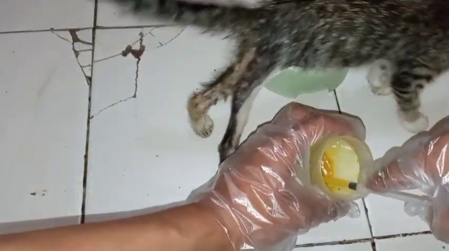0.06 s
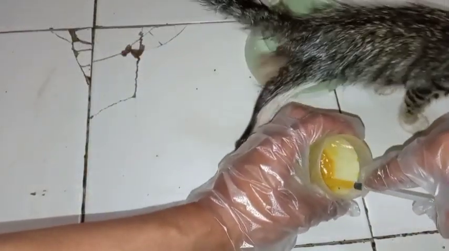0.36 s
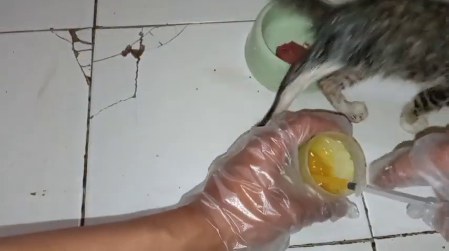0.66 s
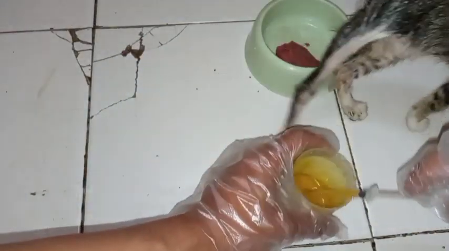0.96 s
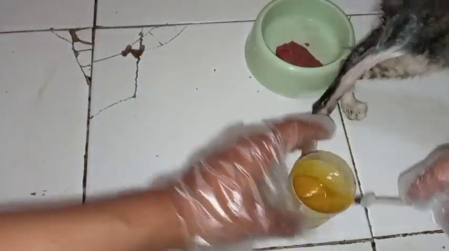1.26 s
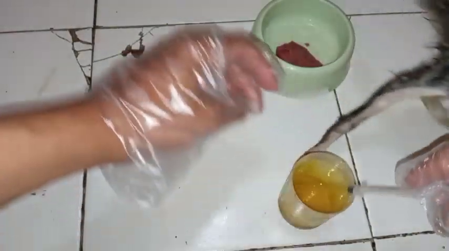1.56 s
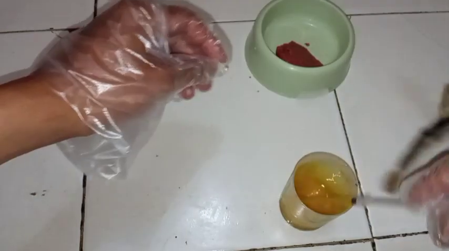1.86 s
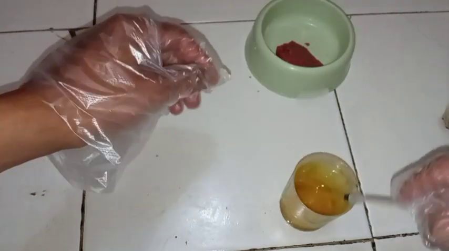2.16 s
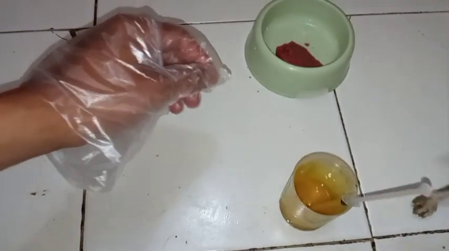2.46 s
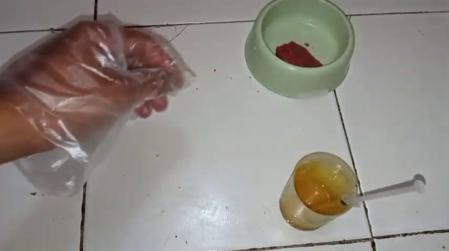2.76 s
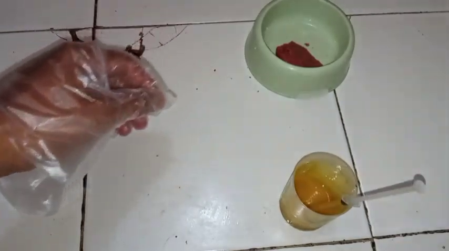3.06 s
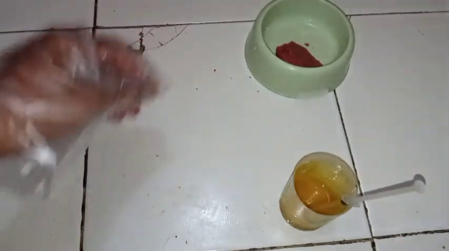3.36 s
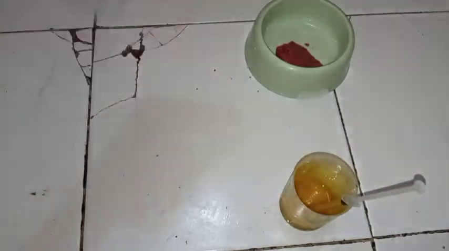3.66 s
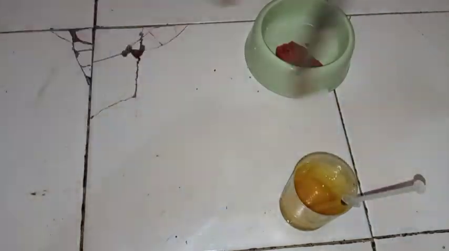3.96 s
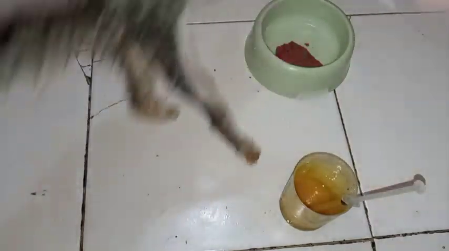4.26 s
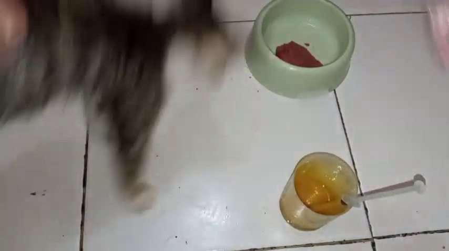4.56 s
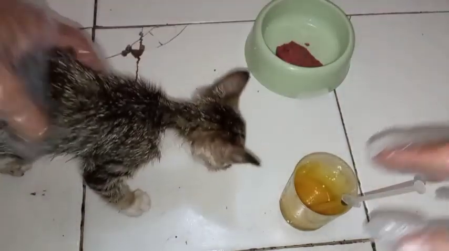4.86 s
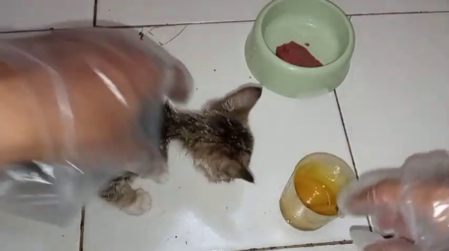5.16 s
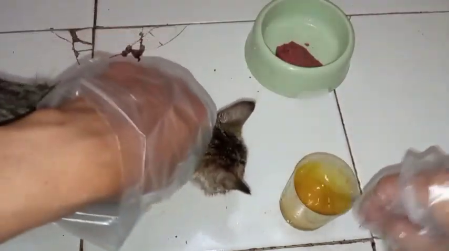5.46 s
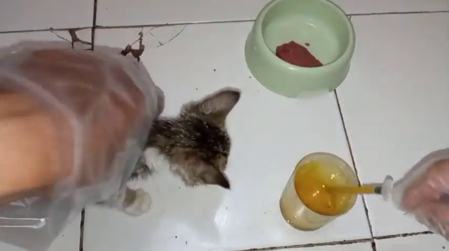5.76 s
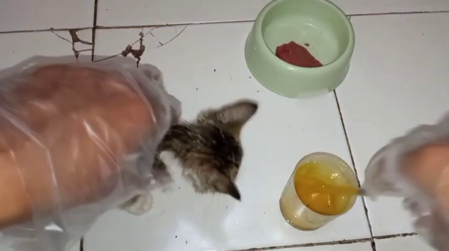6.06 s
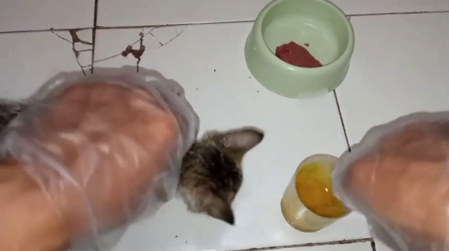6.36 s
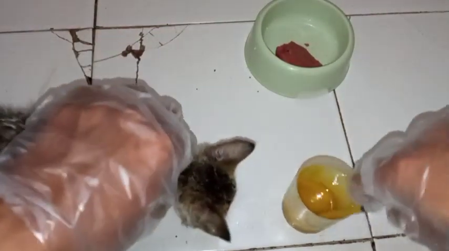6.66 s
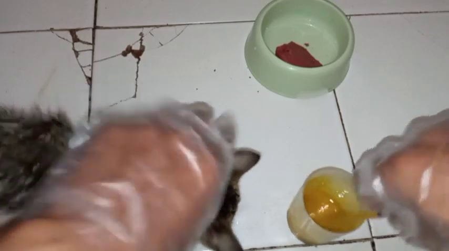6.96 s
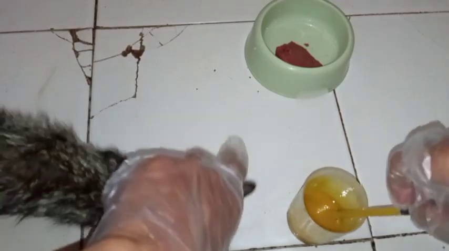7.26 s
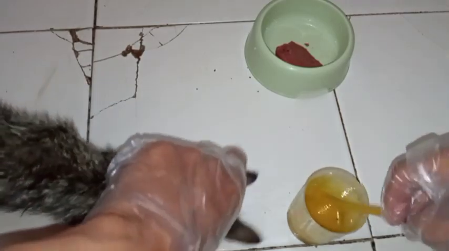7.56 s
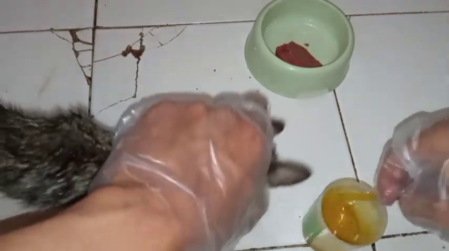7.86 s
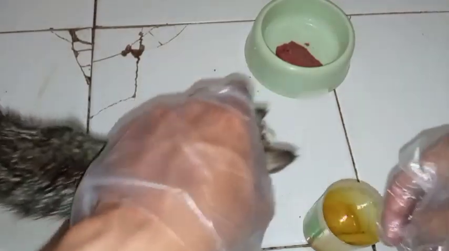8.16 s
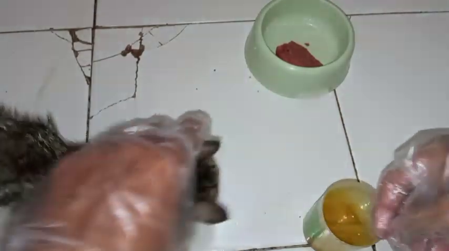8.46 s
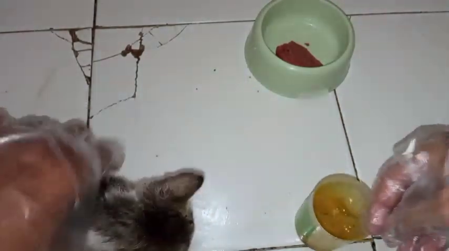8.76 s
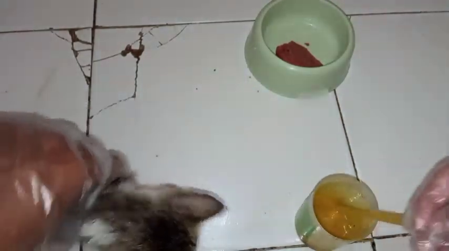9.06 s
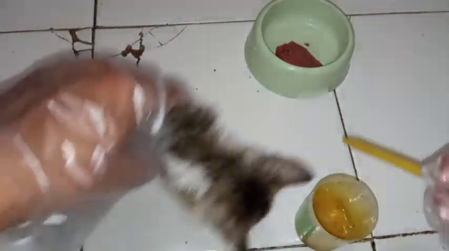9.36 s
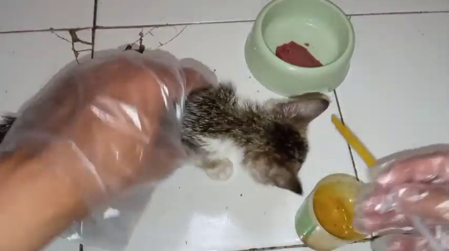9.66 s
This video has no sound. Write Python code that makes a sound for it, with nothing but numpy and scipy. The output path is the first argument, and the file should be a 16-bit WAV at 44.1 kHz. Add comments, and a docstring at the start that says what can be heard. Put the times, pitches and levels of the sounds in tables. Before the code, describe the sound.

Thin plastic gloves crinkle close by and a small plastic cup knocks, while four hard bangs ring through the room from further off.

```python
"""A bare, tiled room, one phone microphone close to a small plastic cup on the floor.
From the start, thin plastic gloves rustle as hands work a syringe in the cup and hold a kitten.
From about 1 s the cup knocks now and then. Near 2, 4, 6 and 8.5 s a hard bang, like a mallet on wood,
comes from further off and rings through the room; a dull thump follows the first.
At the end something scrapes close to the microphone. The house murmurs underneath throughout."""
import sys
import numpy as np
from scipy import signal
from scipy.fft import rfft, irfft
from scipy.io import wavfile
from scipy.ndimage import map_coordinates

SR = 44100
rng = np.random.default_rng(int(sys.argv[2]) if len(sys.argv) > 2 else 0)


def wav_out(sig):
    """Save sig, one row per channel (or a flat mono array), as 16-bit PCM at SR to the path in sys.argv[1]."""
    wavfile.write(sys.argv[1], SR, np.round(np.clip(np.atleast_2d(sig).T, -1, 1) * 32767).astype(np.int16))


N = 432180
RING = np.arange(SR) / SR  # seconds after a blow

# Spells of steady glove rustle. Each row: start and end in seconds, crinkle level in dB,
# rubbing relative to crinkle in dB.
GRIPS = [(0, 0.27, -67.5, -10), (.53, 1.804, -59, -6), (1.84, 2.104, -62.5, 0), (2.617, 3.443, -60, -11),
         (3.45, 3.97, -60.5, -11), (4.01, 4.682, -57, -6.5), (4.711, 5.765, -56, -9.5),
         (5.781, 7.622, -58.5, -6), (7.62, 7.95, -62.5, -8), (7.938, 9.35, -58, -7.5),
         (9.373, 9.8, -60.5, -9.5)]
# Single finger moves. Each row: middle and length in seconds, crinkle level in dB,
# rubbing relative to crinkle in dB.
FINGER_MOVES = [(0.82, 0.19, -57, -12), (1.198, 0.047, -58, -1), (1.525, .17, -59, -4.5),
                (2.293, .08, -74.5, 7), (2.435, 0.13, -58, -10), (2.802, 0.29, -53, -11.5),
                (3.206, 0.28, -51, -10.5), (4.166, 0.38, -48.5, -5.5), (5.183, .06, -54, -9),
                (5.933, 0.18, -53, -10.5), (6.418, .2, -58, -5.5), (7.042, 0.21, -50, -5),
                (7.34, 0.24, -55, -3.5), (8.17, 0.15, -60, -4.5), (8.67, .3, -55, -12),
                (9.046, 0.13, -57, -3.5), (9.218, 0.19, -54, -8.5)]
# The loudest creases snapping over. Each row: start in seconds, level in dB.
CREASES = [(0.132, -45), (0.203, -45), (0.4414, -50.5), (1.5564, -41), (1.9733, -34.5), (2.0698, -31),
           (2.599, -46), (2.6658, -40), (4.557, -37), (4.59, -40.5), (5.697, -34), (6.658, -56.5),
           (8.18, -37.5), (8.654, -32.5)]
# The far bangs. Each row: start in seconds, levels of wood knock, low boom and crack in dB,
# hard 3 kHz ring relative to the crack's tail in dB.
BANGS = [(1.873, -27.5, -38, -48, -2), (3.816, -20.5, -26.5, -42.5, -8), (6.0417, -20.5, -27, -36, 0.5),
         (8.4379, -22.5, -31.5, -35.5, -27)]
# Paths from bang to microphone, the straight one partly blocked. Each row: delay in seconds, gain in dB.
PATHS = [(0, -9), (.008, -2.5), (.0193, -8), (.0257, -3.5), (.0337, -13.5), (.0514, -6)]
# Knocks of cup and syringe. Each row: start in seconds, levels of cup ring, thud on the tile and click
# in dB, pitch as a ratio to the cup's modes.
CUP_KNOCKS = [(.756, -60.5, -82, -44.5, 1), (.963, -59, -64, -40.5, 0.98), (1.021, -34, -45.5, -46, 1),
              (1.262, -51.5, -45, -41, 0.95), (1.722, -54.5, -60, -46.5, 1), (2.412, -58.5, -55, -70, 0.76),
              (5.961, -62, -56, -55, 0.98), (7.49, -63, -62.5, -52, 0.97), (7.929, -49.5, -60.5, -67, 0.92)]
# Slips that start the scrape. Each row: start in seconds, level in dB.
SLIPS = [(9.5901, -37), (9.599, -31), (9.653, -38), (9.675, -32.5), (9.6803, -34)]
# Small handling sounds. Each row: start in seconds, level in dB, pitch in Hz, length in seconds.
BUMPS = [(0.87, -64, 175, 0.075), (0.97, -62, 443, 0.096), (1.31, -61.5, 125, 0.2),
         (2.405, -65, 624, 0.072), (2.78, -63, 356, 0.068), (2.91, -63.5, 398, 0.068),
         (3.17, -63, 690, 0.065), (5.955, -65, 437, 0.067), (7.01, -67.5, 390, 0.35),
         (8.14, -67, 368, 0.051)]  # hands and paws
SQUEAKS = [(4.945, -61, 3950, 0.036), (8.25, -49, 1850, 0.013), (9.29, -64, 4100, 0.046)]  # plastic on plastic

# Things that ring. Each row: frequency in Hz, level in dB, seconds to fall by 60 dB.
WOOD_MODES = [(613.3, 3.5, 0.1), (584, -22.5, 0.077), (451, -8.5, 0.094), (270, -38.5, 0.077)]  # the struck wood
ROOM_MODES = [(96, -5, 0.76), (194.7, -3.5, 0.74), (241, -12.5, 0.4), (274, -2.5, 0.5), (440, -7.5, 0.62),
              (590, -12.5, 0.23), (617.6, 3, 0.5), (696, -1.5, 0.56)]  # standing waves between the walls
CUP_MODES = [(890, -17, 0.03), (998, -1, 0.059), (1054, 6.5, 0.074), (1230, -14, 0.031), (1770, -12.5, .06),
             (1980, -13.5, .06), (2240, -9, 0.049), (3430, -17, .035)]  # the plastic cup
THUMP_MODES = [(149, -31, 0.26), (226.5, -4.5, 0.46), (268, -3, 0.15), (405, -16, 0.31), (445, -1, 0.34),
               (530, -27, 0.11)]  # the soft landing
BODY_MODES = [(330, 1, 0.02), (810, 0, 0.0077), (1235, -1, 0.025)]  # the body that the slips shake

# Tone colours. Each row: frequency in Hz, relative spectral density in dB.
CRINKLE_COLOUR = [(900, -17.5), (1800, -6.5), (2500, -2.5), (3300, -1.5), (4500, 0), (10000, 1),
                  (16000, -2.5)]  # film buckling
RUB_COLOUR = [(150, -18.5), (400, -0.5), (700, -7), (1000, 2.5), (1250, 0), (1600, 2), (2200, 0),
              (3000, -7), (6000, -19.5)]  # film rubbing
KNOCK_COLOUR = [(60, -36.5), (200, -23), (340, -18), (430, 0), (540, -5.5), (640, 3), (730, -13),
                (850, -23), (1400, -23), (2200, -22), (4000, -52)]  # the wood's hollow tail in the room
BOOM_COLOUR = [(35, -59), (70, -13.5), (95, 1), (150, -1.5), (265, -0.5), (450, -2.5), (700, -14.5),
               (950, -12.5), (2000, -27.5), (4000, -60.5)]  # the room's bass
CRACK_COLOUR = [(200, -36), (600, -11.5), (1300, -4.5), (2400, -3), (3400, 0), (5000, 0.5), (6600, 0),
                (8000, -1.5), (10000, -4), (16000, -20)]  # hard contact
SNAP_COLOUR = [(200, -33.5), (1000, -30), (2000, -3), (4500, -13), (5700, 6), (6800, -8.5), (8200, 3),
               (10000, -8), (16000, -17.5)]  # a bang's first edge
THUD_COLOUR = [(40, -47.5), (150, -21.5), (260, -6.5), (420, 2.5), (800, -2), (1300, -3.5), (2500, -13.5),
               (6000, -25)]  # cup on tile
SCRAPE_COLOUR = [(60, -5), (150, -16), (330, -2), (600, -3), (900, 4), (1350, 0.5), (1650, -10), (2300, -9),
                 (4000, -20)]  # the close slide
ROOM_TONE = [(20, -14), (40, 3.5), (58, 7), (90, 1), (180, 1.5), (300, -8), (600, -15.5), (900, -10.5),
             (1400, -21), (1850, -21.5), (3000, -19.5), (16000, -24.5)]  # the house at rest

# The microphone's response. Each row: frequency in Hz, relative gain in dB.
MIC_RESPONSE = [(25, -29), (60, 0), (100, -2), (4500, 1.5), (6400, 4), (8000, -2.5), (9700, 4), (11500, -3),
                (13600, -8.5), (14900, 5), (16000, -1.5)]


def gloves():
    """Close up: countless small creases buckle as the film moves; it rubs; a few creases snap alone."""
    crinkling, rubbing = hand_effort()
    crinkle = colour(grains(per_s=9000, spread_db=3), CRINKLE_COLOUR) * crinkling
    crinkle *= undb(1.1 + 1.37 * wander(60))
    rub = colour(grains(per_s=4000, spread_db=1.5), RUB_COLOUR) * rubbing
    rub *= undb(-0.9 + 0.84 * wander(25))
    for start, db in CREASES:
        add(crinkle, start, undb(db - 6) * burst(CRINKLE_COLOUR, t60=0.018))
    # the pockets of air between film and hand keep changing shape
    film = swirl(crinkle, depth_db=2.5, rate=14) + swirl(rub, depth_db=3.5, rate=13)
    return room(film, wet_db=-12, t60=0.28)


def hand_effort():
    """Strength of crinkling and of rubbing: grips and finger moves add in power."""
    gestures = [(start, undb(db) * envelope(end - start, attack=0.066, release=0.055), rub_db)
                for start, end, db, rub_db in GRIPS]
    for middle, length, db, rub_db in FINGER_MOVES:
        bell = np.exp(-(2 * (RING - 0.5) / length) ** 2)  # the finger speeds up, then slows
        gestures.append((middle - 0.5, undb(db) * bell, rub_db))
    crinkle_power, rub_power = np.full(N, undb(-82) ** 2), np.full(N, undb(-76) ** 2)  # hands at rest
    for start, strength, rub_db in gestures:
        add(crinkle_power, start, strength ** 2)
        add(rub_power, start, (strength * undb(rub_db)) ** 2)
    return np.sqrt(crinkle_power), np.sqrt(rub_power)


def bangs():
    """Further off: a snap arrives first, the wood's knock by way of the walls, and the bass last."""
    # every bang comes from the same spot, so these tails are the same for each
    hollow = wash(KNOCK_COLOUR, t60=0.52, build=0.0017)
    bright = wash(CRACK_COLOUR, t60=0.45, build=0.0083)
    hard = wash([(2300, -25.5), (3050, 0.5), (3500, -3), (5000, -17.5)], t60=0.35, build=0.0019)
    mode_rise = 1 - np.exp(-RING / 0.052)
    out = np.zeros(N)
    for start, knock_db, boom_db, crack_db, hard_db in BANGS:
        for delay, path_db in PATHS:
            add(out, start + delay, undb(knock_db + path_db - 0.5) * ring(WOOD_MODES))
        add(out, start, undb(knock_db - 3) * hollow)
        add(out, start, undb(boom_db + 4) * wash(BOOM_COLOUR, t60=0.55, build=0.055))
        add(out, start, undb(boom_db - 3.5) * ring(ROOM_MODES, scatter=1) * mode_rise)
        add(out, start, undb(crack_db + 17) * burst(SNAP_COLOUR, t60=0.013))
        # the first strong reflection carries the crack
        add(out, start + PATHS[1][0], undb(crack_db - 1) * burst(CRACK_COLOUR, t60=0.04))
        add(out, start, undb(crack_db + 6) * (bright + undb(hard_db) * hard))
    return out


def cup():
    """On the floor by the microphone: hard plastic clicks, thuds on the tile and rings briefly."""
    out = np.zeros(N)
    for start, ring_db, thud_db, click_db, pitch in CUP_KNOCKS:
        modes = [(hz * pitch, db, t60) for hz, db, t60 in CUP_MODES]
        add(out, start, undb(ring_db + 1) * ring(modes))
        add(out, start, undb(thud_db + 3.5) * burst(THUD_COLOUR, t60=0.13))
        add(out, start, undb(click_db + 3) * burst(CRACK_COLOUR, t60=0.018))
    return room(out, wet_db=-7, t60=0.31)


def thump(start=1.9735):
    """Something heavy and soft lands and stirs the room's bass."""
    landing = ring(THUMP_MODES, scatter=0.84) * (1 - np.exp(-RING / 0.002))
    boom = undb(2.5) * wash(BOOM_COLOUR, t60=0.41, build=0.046)
    out = np.zeros(N)
    add(out, start, undb(-29) * (landing + boom))
    return out


def scrape(slide_start=9.58):
    """Close by, something sticks and slips a few times as its slide gathers speed, then slows."""
    slide = np.zeros(N)
    add(slide, slide_start, undb(-51.5) * envelope(0.13, attack=0.13, release=0.26))
    out = colour(grains(per_s=1200, spread_db=2) * slide, SCRAPE_COLOUR)
    for start, db in SLIPS:
        add(out, start, undb(db - 5) * ring(BODY_MODES))
    return room(out, wet_db=-3, t60=0.3)


def handling():
    """Around the cup, hands and paws bump softly and plastic squeaks on plastic."""
    return room(swells(BUMPS, width=0.35) + swells(SQUEAKS, width=0.098), wet_db=-6, t60=0.3)


def room_tone():
    """Behind everything, the low, slightly wavering murmur of the house."""
    return colour(rng.standard_normal(N), ROOM_TONE) * undb(-68.5 + 0.72 * wander(3.7))


def room(x, wet_db, t60):
    """Tiled walls add a tail to a near sound."""
    tail = rng.standard_normal(SR) * fade(t60) * (1 - np.exp(-RING / 0.006))
    return x + undb(wet_db) * signal.oaconvolve(x, tail / np.linalg.norm(tail))[:N]


def swells(rows, width):
    """Short swells of noise in a resonance whose width is a share of its pitch."""
    out = np.zeros(N)
    step = 1 + width
    for start, db, hz, length in rows:
        band = [(hz / step ** 2, -35), (hz / step, -12), (hz, 0), (hz * step, -12), (hz * step ** 2, -45)]
        arch = np.sin(np.pi * np.minimum(RING / length, 1) ** 0.65)
        add(out, start, undb(db) * colour(rng.standard_normal(SR), band) * arch)
    return out


def swirl(x, depth_db, rate):
    """Resonances about a fifth of an octave wide come and go, rate times a second."""
    hz, seconds, frames = signal.stft(x, SR, nperseg=512)
    cells = np.meshgrid(5 * np.log2(1 + hz / 200), seconds * rate, indexing="ij")
    field = map_coordinates(rng.standard_normal((40, 400)), cells, order=1, mode="wrap")
    return signal.istft(frames * undb(depth_db * field), SR)[1][:N]


def grains(per_s, spread_db):
    """A dense stream of tiny clicks, a few much larger than the rest, at rms 1."""
    sizes = undb(spread_db * np.minimum(rng.exponential(size=N), 6))
    clicks = (rng.random(N) < per_s / SR) * sizes * rng.choice([-1, 1], N)
    return clicks / np.sqrt(np.mean(clicks ** 2))


def ring(modes, scatter=0):
    """Decaying modes; scatter 1 gives each its own phase."""
    return sum(undb(db) * fade(t60) * np.sin(2 * np.pi * (hz * RING + scatter * rng.random()))
               for hz, db, t60 in modes)


def burst(points, t60):
    """Coloured noise that starts at once and dies away."""
    return colour(rng.standard_normal(SR) * fade(t60), points)


def wash(points, t60, build):
    """Diffuse room sound: reflections pile up over about build seconds, then fade."""
    rise = 1 - np.exp(-(RING / build) ** 2)
    return colour(rng.standard_normal(SR) * fade(t60) * rise, points)


def colour(x, points):
    """Causal filter of unit power through (Hz, dB) points."""
    size = 4096
    hz, db = np.transpose(points)
    log_hz = np.log(np.maximum(np.arange(size // 2 + 1) * SR / size, 1))
    cepstrum = irfft(np.log(undb(np.interp(log_hz, np.log(hz), db))))
    cepstrum[1:size // 2] *= 2  # fold onto positive time for minimum phase
    cepstrum[size // 2 + 1:] = 0
    response = irfft(np.exp(rfft(cepstrum)))
    return signal.oaconvolve(x, response / np.linalg.norm(response))[:len(x)]


def envelope(length, attack, release):
    """Straight rise, hold until length is over, exponential release; all in seconds."""
    t = np.arange(int((length + 10 * release) * SR)) / SR
    return np.minimum(t / attack, 1) * np.exp(-np.maximum(t - length, 0) / release)


def fade(t60):
    """Exponential decay, 60 dB in t60 seconds."""
    return np.exp(-np.log(1000) * RING / t60)


def wander(rate):
    """Random drift with a spread near 1 and rate turning points a second."""
    knots = rng.standard_normal(N // 100)
    return np.interp(np.arange(N) / SR * rate, np.arange(len(knots)), knots)


def undb(db):
    """Decibels to gain."""
    return 10 ** (np.asarray(db) / 20)


def add(out, start, x):
    """Mix x into out from start seconds on."""
    i = max(int(start * SR), 0)
    out[i:i + len(x)] += x[:max(len(out) - i, 0)]


def scene():
    """Near and far sources meet at one microphone."""
    return (bangs() + thump() + cup() + gloves() + handling() + scrape() + room_tone())[None]


def record(dry):
    """The phone's microphone port resonates in the treble; deep bass is thinned, the top cut at 16 kHz."""
    top_cut = signal.ellip(10, 0.2, 70, 16000, fs=SR, output="sos")
    return signal.sosfilt(top_cut, colour(dry[0], MIC_RESPONSE))[None]


dry = scene()
out = record(dry)
wav_out(out)
```